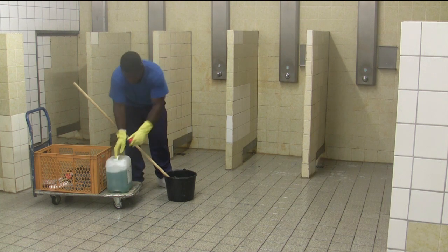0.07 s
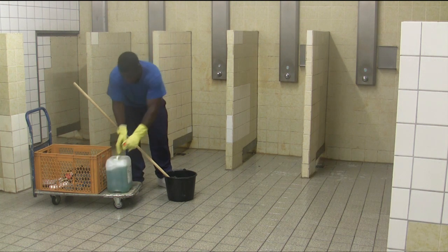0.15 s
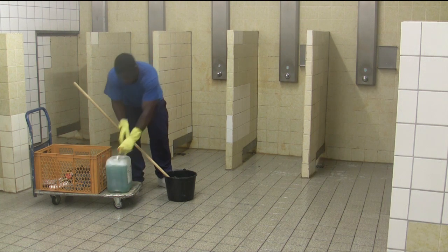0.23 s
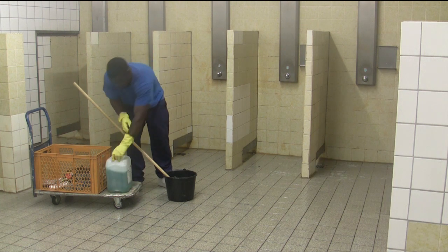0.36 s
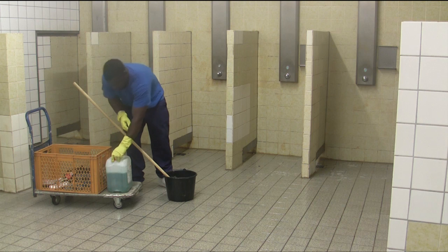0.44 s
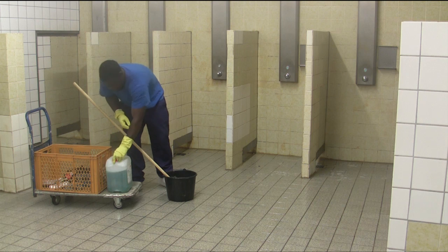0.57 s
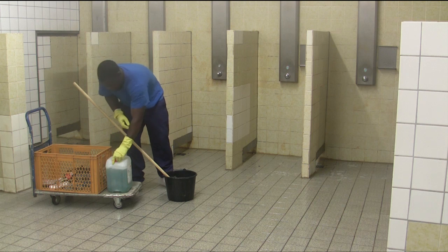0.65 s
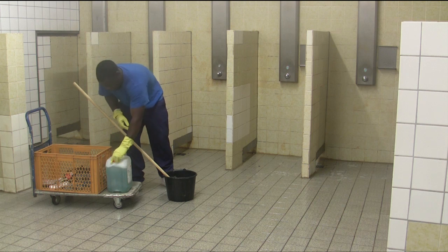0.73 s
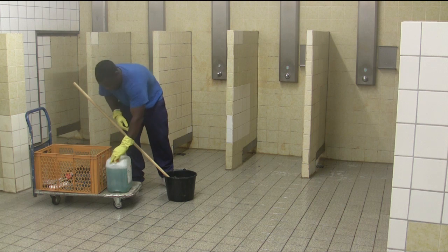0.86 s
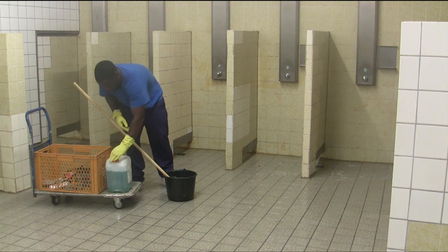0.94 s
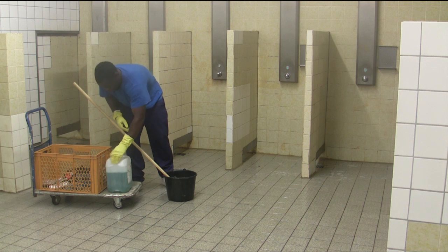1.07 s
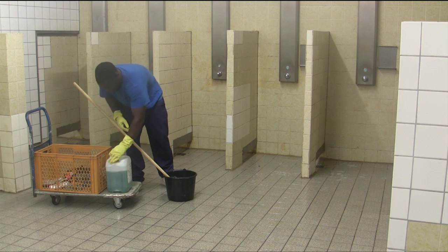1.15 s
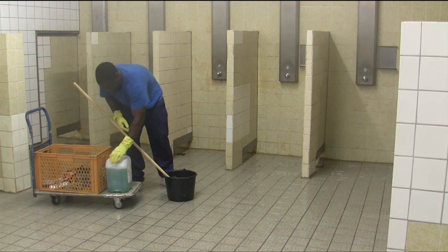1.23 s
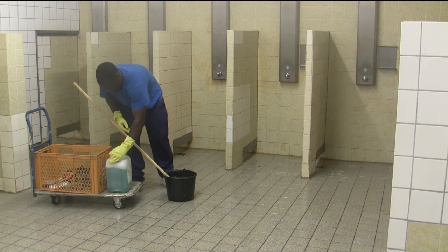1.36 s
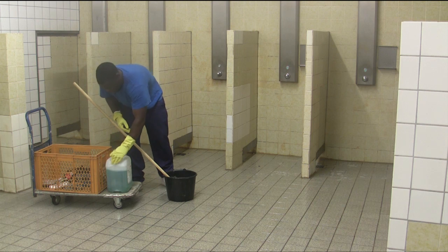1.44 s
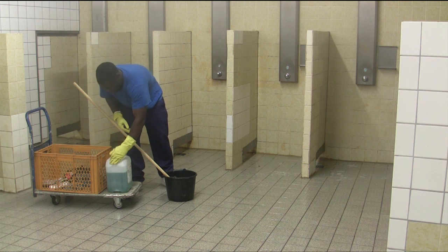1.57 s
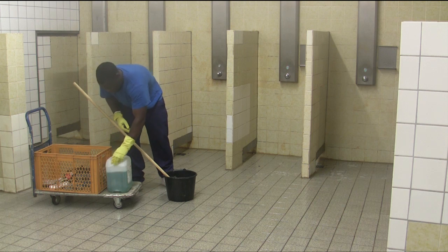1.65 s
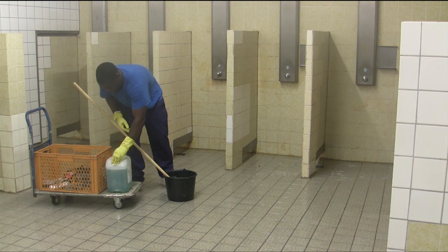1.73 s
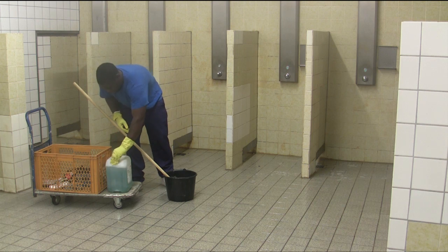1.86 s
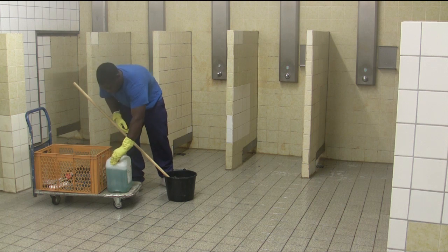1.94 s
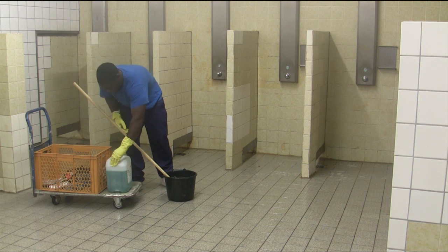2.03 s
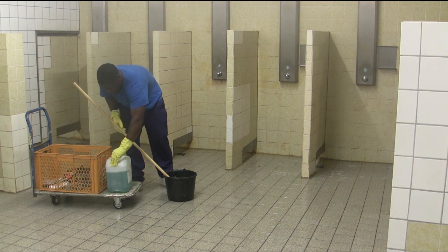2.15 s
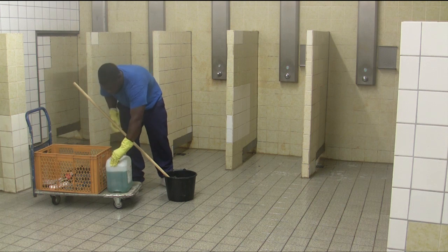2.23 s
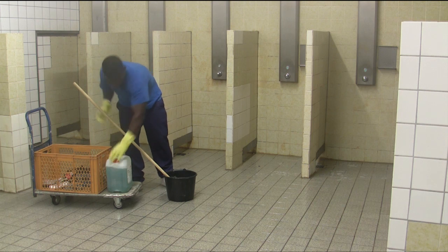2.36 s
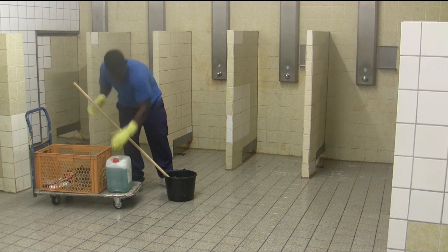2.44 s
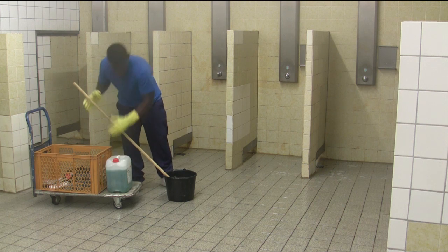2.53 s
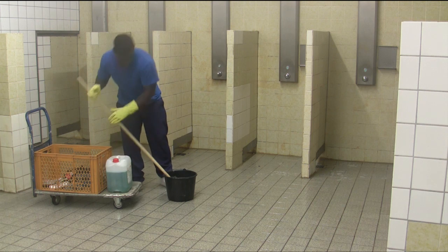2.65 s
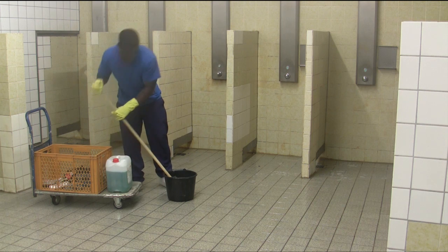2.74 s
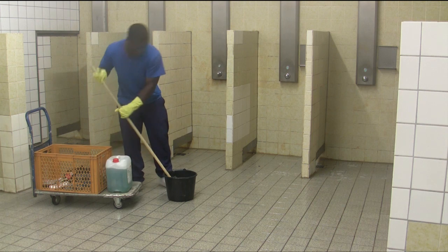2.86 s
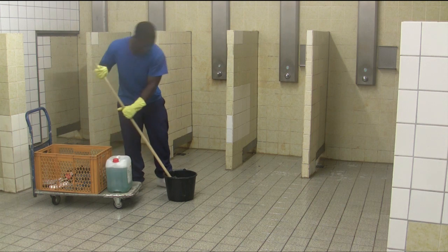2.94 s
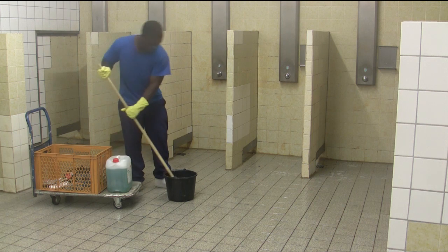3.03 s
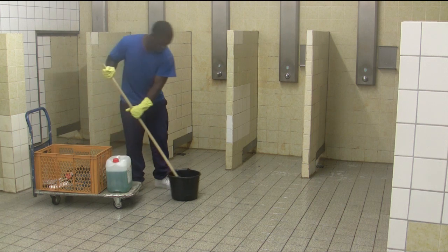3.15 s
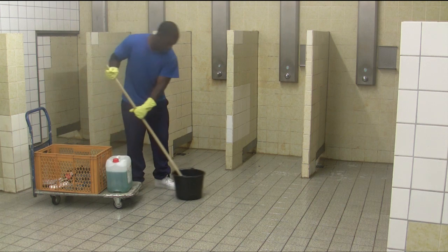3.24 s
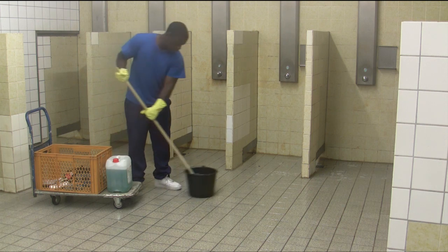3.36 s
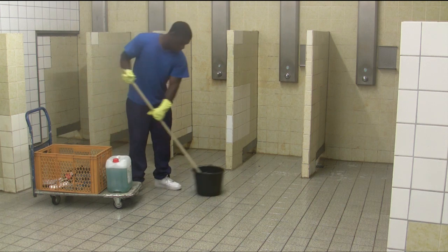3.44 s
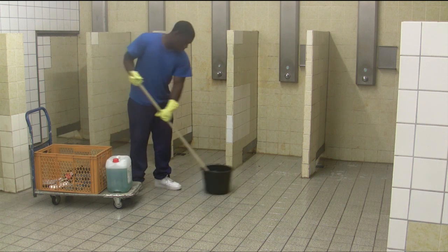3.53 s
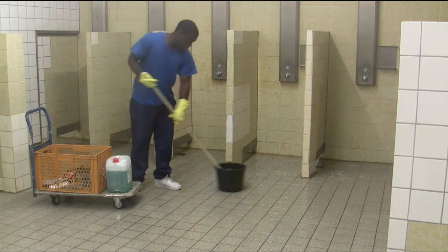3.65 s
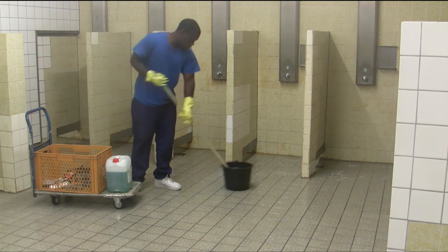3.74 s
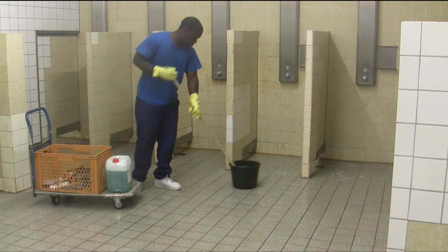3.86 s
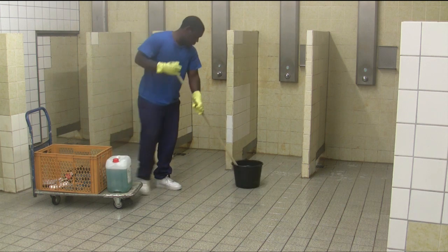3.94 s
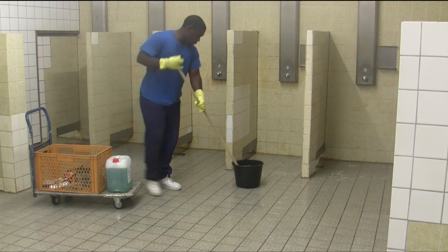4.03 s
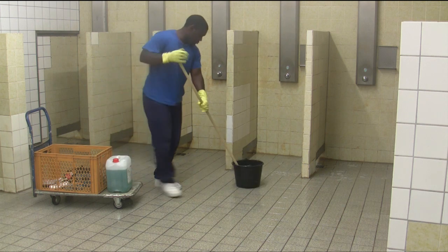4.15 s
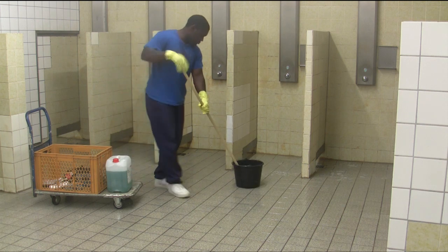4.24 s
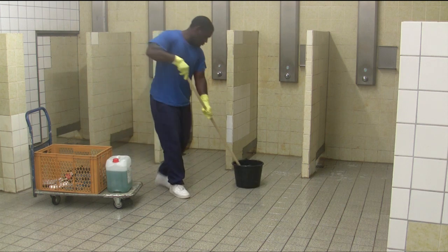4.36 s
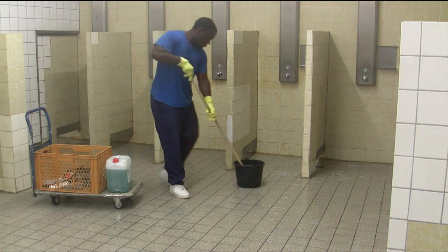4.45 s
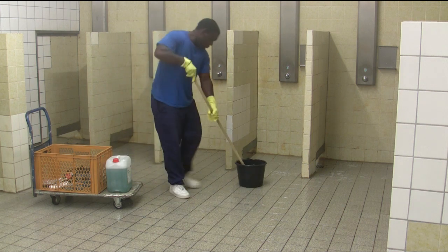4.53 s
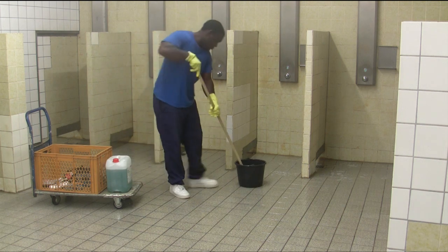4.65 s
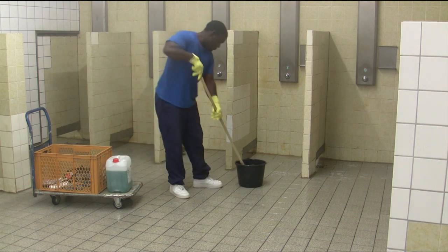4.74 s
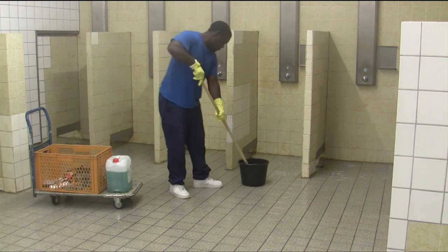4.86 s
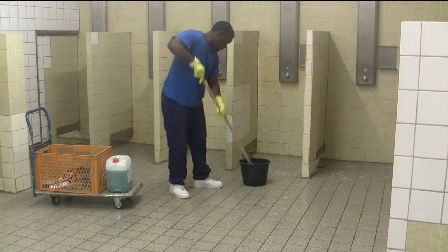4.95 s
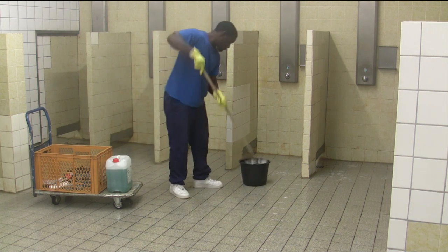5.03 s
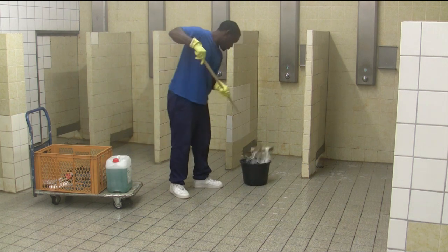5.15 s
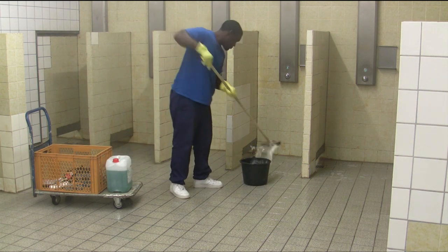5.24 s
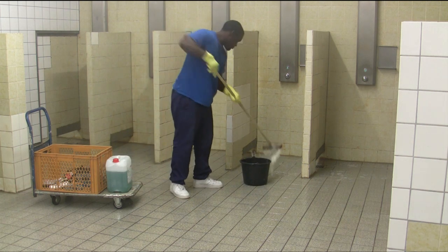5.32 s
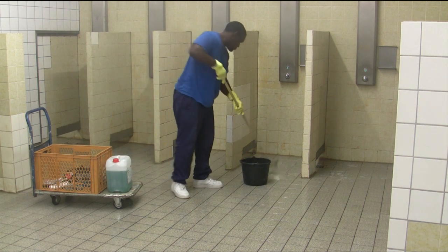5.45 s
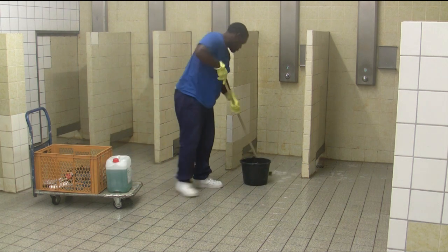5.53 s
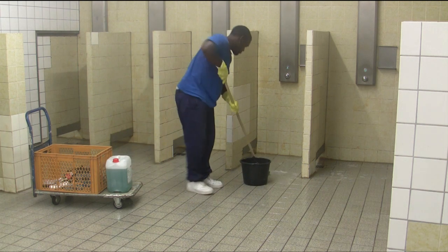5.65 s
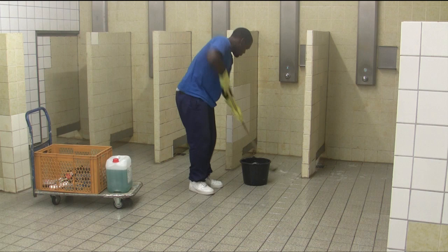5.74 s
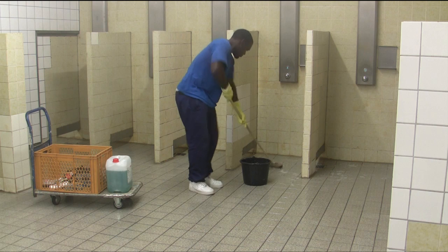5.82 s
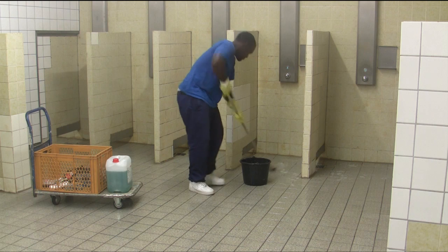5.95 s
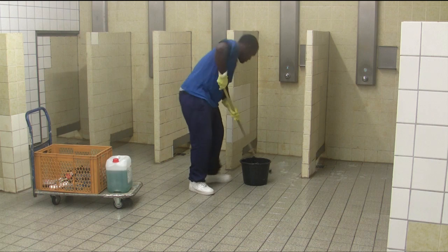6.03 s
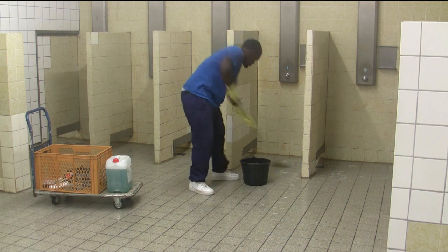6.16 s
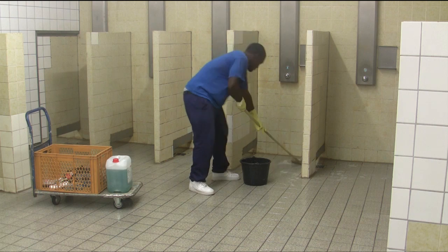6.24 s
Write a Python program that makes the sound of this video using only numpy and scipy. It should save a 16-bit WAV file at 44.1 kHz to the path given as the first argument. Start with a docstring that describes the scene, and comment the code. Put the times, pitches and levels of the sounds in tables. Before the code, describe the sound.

A plastic canister cap clicks tight, then a water bucket scrapes over wet tiles and a brush scrubs in an echoing washroom.

```python
"""A cleaner at work in a hard, tiled washroom, heard in mono from a few metres away.
First he screws the cap onto a plastic canister: the thread grates, the walls boom, the cap snaps tight.
He takes a long-handled brush, its wood knocking on a bucket of water, and pushes the bucket along with it:
the base scrapes, the tub booms, the water gulps, and his soles slap over the wet floor. Last he scrubs in
short, hissing strokes that end in a swish of water. It all rings on in the room over a low rush of air."""
import sys
import numpy as np
from scipy import signal
from scipy.fft import rfft, irfft
from scipy.io import wavfile

SR = 44100
rng = np.random.default_rng(int(sys.argv[2]) if len(sys.argv) > 2 else 0)


def wav_record(signal):
    """Record a signal, one row per channel, as 16-bit PCM in the file named by sys.argv[1]."""
    frames = np.transpose(np.atleast_2d(signal))
    bounded = np.clip(frames, -1, 1)
    # unit amplitude maps onto the largest positive 16-bit level
    quanta = np.round(bounded * 32767).astype(np.int16)
    wavfile.write(sys.argv[1], SR, quanta)


N = 277389
T = np.arange(N) / SR


def canister():
    """The cap grates on its thread, flexes the hollow walls and clicks as it tightens."""
    # twists of the cap: t/s, level/dB, time to full force/s
    turns = [(0.0, -30, 0.004), (0.522, -38.5, .09), (0.69, -34, 0.11), (0.92, -39, 0.089),
             (1.119, -28, 0.054), (1.329, -29.5, 0.058), (1.421, -67, 0.024)]
    # clicks and creaks of the cap: t/s, level/dB, treble share/dB, decay/s
    clicks = [(0.07, -10, -14, 0.0026), (0.0915, -10, -9, 0.0098), (0.483, -23.5, -3, .001),
              (0.5187, -10.5, -6.5, 0.0036), (0.567, -11, -11, 0.0015), (0.694, -17, -26, 0.0023),
              (0.727, -12, -22, .003), (0.787, -6, -13, 0.0017), (0.932, -14.5, -25, 0.0018),
              (1.1324, -6.5, -19, 0.0032), (1.169, 0.5, -17, .02), (1.3658, 1, -13, 0.0047),
              (1.4, -6, -15, 0.0091), (1.9474, -1, -4, 0.0027)]
    # bumps on the canister: t/s, level/dB, f/Hz
    bumps = [(0.002, -1.5, 248), (0.03, -1.5, 123), (0.122, 3, 309), (1.133, -2, 222), (1.195, 1, 202),
             (1.43, -6, 189)]
    # hollow ring of the walls: f/Hz, level/dB, t60/s
    wall_modes = [(138, -9, 0.074), (165, 0.5, 0.067), (212, 1, 0.29), (264, -1, 0.075), (292, 1, 0.025),
                  (476, -6.5, 0.15)]
    # thin ring of the cap: f/Hz, level/dB, t60/s
    cap_modes = [(8000, 0, 0.0065), (8300, -9, .007)]
    # tone of the grating thread: f/Hz, level/dB
    thread_colour = [(70, -48), (300, 6.5), (520, 2), (850, 3.5), (1250, -6), (1750, -7.5), (2300, -12),
                     (3100, -11), (4300, -21), (8000, -24), (15000, -56.5)]
    # body of a click: f/Hz, level/dB
    click_colour = [(150, -6.5), (650, 3), (880, 7), (1150, 3), (1700, 6.5), (2300, 4.5), (3100, 8.5),
                    (4600, -3), (9000, -43.5)]
    # bright edge from the cap's stiff rim: f/Hz, level/dB
    rim_colour = [(2000, -4), (4600, 2), (6900, 11.5), (8100, 8), (9400, 8), (12000, 0), (16000, -5)]
    rub = sum(undb(db) * effort(s, rise, fall=0.058) for s, db, rise in turns)
    # from the first full twist to the last snap the hand never quite lets go
    grip = undb(-46.5) * ((T > turns[1][0]) & (T < clicks[-1][0]))
    grating = grains(rate=650, spread_db=2.0) * (rub + grip)
    thread = undb(-4.5) * colour(grating, thread_colour)
    cap = undb(-17) * ring(grating * rub / rub.max(), cap_modes)  # sings on the hardest twists
    walls = undb(-2.5) * ring(grains(rate=570, spread_db=2.5) * rub, wall_modes)
    body, rim = np.zeros(N), np.zeros(N)
    for s, db, treble_db, decay in clicks:
        snap = undb(db) * burst(s, decay)
        body += snap
        rim += undb(treble_db) * snap
    snaps = colour(body, click_colour) + colour(rim, rim_colour)
    return thread + cap + walls + snaps + booms(bumps, t60=0.08)


def bucket():
    """The base sticks and slips over gritty tiles; the slips and the rocking water set the tub booming."""
    # pushes: t/s, level/dB, time to full speed/s, coasting/s, boom against scrape/dB
    pushes = [(3.04, -19, 0.69, 0.15, -6.5), (3.9, -32, 0.042, 0.17, -3), (4.47, -29.5, 0.1, 0.17, -13),
              (4.769, -25, 0.15, 0.061, -12), (5.109, -24.5, 0.072, 0.065, -7)]
    # water left rocking by the first shove: t/s, level/dB, rise/s, decay/s
    rocking = (3.5, -33.5, 0.7, 0.25)
    # water gulping around the brush head: t/s, level/dB, f/Hz
    gulps = [(3.26, 1.5, 355), (3.66, 13.5, 382.4), (3.99, 3, 280), (4.12, 2, 421), (5.191, 6.5, 352),
             (5.25, 4, 324), (5.335, 4, 341)]
    # boom of the tub: f/Hz, level/dB, t60/s
    tub_modes = [(176, -8, 0.05), (280, -6, 0.049), (374.4, -2, 0.11), (407.6, 4.5, 0.097),
                 (493, -7, 0.093)]
    # tone of the scrape: f/Hz, level/dB
    scrape_colour = [(50, -26), (130, -12), (280, 1), (600, 1.5), (900, 3), (1300, -2), (1800, -6),
                     (2300, -14), (2950, -11.5), (4200, -23.5), (7000, -30.5), (10000, -38), (15000, -44)]
    s, db, rise, fall = rocking
    drive = undb(db) * effort(s, rise, fall)
    speed = np.zeros(N)
    for s, db, rise, coast, boom_db in pushes:
        push = undb(db) * effort(s, rise, coast)
        speed += push
        drive += undb(boom_db) * push
    slips = grains(rate=2200, spread_db=4.0) * undb(2 * drift(rate=45))
    tub = ring(grains(rate=660, spread_db=0) * drive, tub_modes)
    return colour(slips * speed, scrape_colour) + tub + booms(gulps, t60=0.075)


def brush():
    """Wet bristles flick over the tiles; bearing down makes them rasp against the wooden head."""
    # strokes: t/s, length/s, bristle hiss/dB, rasp/dB
    strokes = [(5.51, .12, -43, -42), (5.625, 0.027, -45, -29.5), (5.781, .11, -34, -31.5),
               (5.982, 0.13, -37, -58), (6.163, 0.1, -30.5, -36.5)]
    # bright hiss of the bristles: f/Hz, level/dB
    bristle_colour = [(400, -31), (1500, 3.5), (2300, 2.5), (3050, 9.5), (4200, 3.5), (6500, 1.5),
                      (9000, -1.5), (14000, -7), (16000, -11)]
    # midrange rasp: f/Hz, level/dB
    rasp_colour = [(80, -36), (250, -8), (450, 3.5), (900, 5), (1600, 3.5), (2300, -1.5), (3000, 5.5),
                   (4500, -8), (12000, -44)]
    speed = sum(undb(db) * stroke(s, length) for s, length, db, _ in strokes)
    pressure = sum(undb(db) * stroke(s, length) for s, length, _, db in strokes)
    flicks = grains(rate=5000, spread_db=2.6) * undb(0.69 * drift(rate=24))
    rasp = grains(rate=2000, spread_db=2)
    return undb(5.5) * colour(flicks * speed, bristle_colour) + colour(rasp * pressure, rasp_colour)


def wet_floor():
    """Each slap bursts the film of water into a spray of small ticks; the long ones open softly."""
    # soles, water and brush slapping the tiles: t/s, level/dB, decay/s
    slaps = [(2.679, -13.5, 0.012), (2.721, -8, 0.0098), (2.842, -3.5, 0.068), (2.92, -8.5, 0.06),
             (2.99, -7, 0.0037), (3.26, -4, 0.082), (3.465, 2, 0.02), (4.173, 0.5, 0.026),
             (4.524, -6, 0.03), (4.9, -1, 0.18), (5.16, -2, 0.022), (5.43, -2.5, 0.034),
             (5.508, 3.5, 0.0082), (5.633, 12, 0.014)]
    # tone of the splatter: f/Hz, level/dB
    slap_colour = [(200, 0), (900, 10), (3000, 5), (4500, 3), (7000, -2), (10000, -8.5), (15000, -17)]
    spray = np.zeros(N)
    for s, db, decay in slaps:
        age = np.maximum(T - s, 0) / decay
        attack = 1 - np.exp(-age / 0.28)
        spray += undb(db) * attack * np.exp(-age) / np.sqrt(decay * SR / 2)
    return undb(-5) * colour(spray * grains(rate=2500, spread_db=6.5), slap_colour)


def swish():
    """A hard push drives a wave ahead of the brush: a band of splashing that sinks in pitch as it swells."""
    # path of the swish: t/s, level/dB, centre f/Hz
    sweep = [(6.181, -31.5, 2321), (6.24, -32, 1404), (6.29, -28, 752)]
    s, db, hz = np.transpose(sweep)
    swell = undb(np.interp(T, s, db, left=-150))
    release = np.exp(-np.maximum(T - s[-1], 0) / 0.01)
    froth = signal.sosfilt(signal.butter(5, 400, fs=SR, output="sos"), rng.standard_normal(N))
    carrier = np.cos(2 * np.pi * np.cumsum(np.interp(T, s, hz)) / SR)
    return swell * release * unit(froth * carrier)


def handle():
    """The wooden handle taps the rim of the bucket as it is picked up."""
    # knocks: t/s, level/dB
    knocks = [(2.729, 1), (2.80, -7)]
    # dry ring of the wood: f/Hz, level/dB, t60/s
    wood_modes = [(520, -3, 0.034), (880, -8, 0.034), (1084, 7, 0.0065), (1400, -3, 0.0092),
                  (2740, -18, 0.012)]
    return undb(-7.0) * ring(blows(knocks), wood_modes)


def cap_scuff():
    """The cap scuffs briefly over the neck as it is set on."""
    return undb(-16.5) * ring(burst(0.09, decay=0.017), [(5260, 0, 0.0025)])


def room(x, patterns=5, glide_s=0.035, direct_db=-6.5):
    """The sources keep moving, so they glide from one pattern of echoes to the next."""
    place = T / glide_s
    fades = (np.sin(np.pi / 2 * np.minimum((place - k) % patterns, 2)) for k in range(patterns))
    return undb(direct_db) * x + sum(through(x * fade, room_response()) for fade in fades)


def room_response():
    """A few hard reflections and a diffuse tail that hangs longest in the midrange."""
    # decay of the tail: f/Hz, t60/s
    room_t60 = [(100, 0.72), (400, 1.77), (1500, 1.9), (3000, 1.57), (5500, 1.49), (9000, 0.9),
                (15000, 1.06)]
    # first reflections from floor and partitions: delay/s, gain
    echoes = [(.0018, 0.046), (.0078, .13), (0.0166, 0.12), (0.022, 0.38)]
    t = T[:2 * SR]
    hz = np.fft.rfftfreq(len(t), 1 / SR)
    noise = rfft(rng.standard_normal(len(t)))
    centres = np.geomspace(100, 16000, 10)
    tail = np.zeros(len(t))
    for centre, share in zip(centres, np.eye(len(centres))):
        band = irfft(noise * over_hz(np.c_[centres, share], hz))
        tail += band * np.exp(-np.log(1000) * t / over_hz(room_t60, centre))
    tail *= 1 - np.exp(-t / 0.00064)
    tail /= np.linalg.norm(tail)
    for delay, gain in echoes:
        tail[int(delay * rng.uniform(.9, 1.1) * SR)] += gain
    return tail


def ventilation():
    """A low, steady rush of air."""
    # tone of the air: f/Hz, level/dB
    air_colour = [(20, -2), (40, -9), (75, -0.5), (130, 1.5), (300, -2), (480, -4.5), (800, -15.5),
                  (1500, -17.5), (3000, -23), (6000, -42), (10000, -44), (16000, -63)]
    return undb(-47.5 + 0.7 * drift(rate=8.2)) * colour(rng.standard_normal(N), air_colour)


def effort(s, rise, fall):
    """Force builds up from time s, then dies away."""
    return np.clip((T - s) / rise, 0, 1) ** 1.17 * np.exp(-np.maximum(T - s - rise, 0) / fall)


def stroke(s, length, attack_s=0.022, release_s=0.024):
    """The brush speeds up, travels and stops."""
    return np.clip((T - s) / attack_s, 0, 1) * np.exp(-np.maximum(T - s - length, 0) / release_s)


def grains(rate, spread_db):
    """Tiny random impacts, about `rate` a second, their sizes scattered by spread_db; rms 1."""
    sizes = undb(spread_db * np.minimum(rng.exponential(size=N), 4))
    return unit((rng.random(N) < rate / SR) * sizes * rng.choice([-1, 1], N))


def burst(s, decay, size=8192):
    """A sharp tick and its dying crackle, with an even spectrum and unit energy."""
    crackle = rng.standard_normal(size) ** 3 * np.exp(-T[:size] / decay)
    crackle[0] += .55 * np.linalg.norm(crackle)  # the leading tick
    spectrum = rfft(crackle)
    crack = irfft(spectrum / np.abs(spectrum))[:size // 2]
    x = np.zeros(N + size)
    x[int(s * SR):int(s * SR) + len(crack)] = crack / np.linalg.norm(crack)
    return x[:N]


def blows(hits):
    """One impulse for each knock."""
    x = np.zeros(N)
    for s, db in hits:
        x[int(s * SR)] += undb(db)
    return x


def booms(hits, t60):
    """Each blow rings one hollow resonance at its own pitch."""
    return sum(ring(blows([(s, db)]), [(hz, 0, t60)]) for s, db, hz in hits)


def ring(x, modes):
    """Drive the damped modes of an object; it radiates little below its lowest mode."""
    t = T[:SR // 2]
    response = sum(undb(db - 60 * t / t60) * np.sin(2 * np.pi * hz * t) for hz, db, t60 in modes)
    low_cut = signal.butter(2, 1.07 * modes[0][0], "high", fs=SR, output="sos")
    return through(x, signal.sosfilt(low_cut, response))


def colour(x, curve, size=4096):
    """Minimum-phase EQ in the shape of the curve."""
    magnitude = undb(over_hz(curve, np.fft.rfftfreq(size, 1 / SR)))
    cepstrum = irfft(np.log(magnitude))
    cepstrum[1:size // 2] *= 2
    cepstrum[size // 2 + 1:] = 0
    return through(x, irfft(np.exp(rfft(cepstrum))))


def through(x, response):
    """Pass a sound through an impulse response scaled to unit energy."""
    return signal.fftconvolve(x, response / np.linalg.norm(response))[:len(x)]


def drift(rate):
    """A random wobble with a spread near 1 and `rate` new values a second."""
    knots = rng.standard_normal(2000)
    return np.interp(T * rate, np.arange(len(knots)), knots)


def over_hz(curve, hz):
    """Read a curve on a log-frequency axis."""
    f, values = np.transpose(curve)
    return np.interp(np.log(hz + 1), np.log(f), values)


def undb(db):
    """Decibels to gain."""
    return 10 ** (np.asarray(db) / 20)


def unit(x):
    """Scale to rms 1."""
    return x / np.sqrt(np.mean(x ** 2))


def scene():
    """The cleaner's sounds share the room, over a bed of air; both channels are the same."""
    sources = cap_scuff() + canister() + handle() + bucket() + wet_floor() + brush() + swish()
    mono = undb(-2.5) * room(sources) + ventilation()
    return np.array([mono, mono])


def record(dry):
    """A steep low-pass cuts the top above 15.8 kHz."""
    return signal.sosfilt(signal.ellip(10, .2, 70, 15800, fs=SR, output="sos"), dry)


dry = scene()
out = record(dry)
wav_record(out)
```